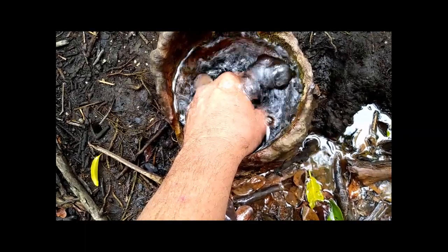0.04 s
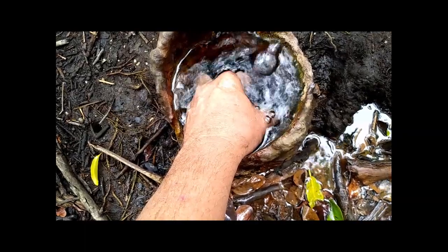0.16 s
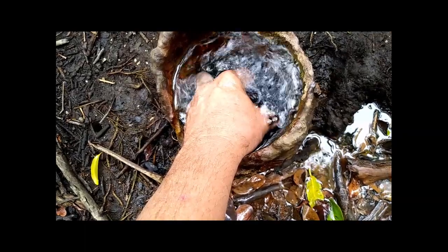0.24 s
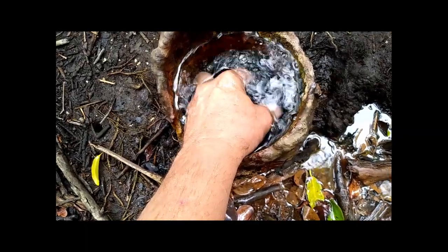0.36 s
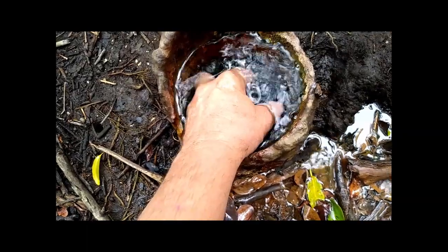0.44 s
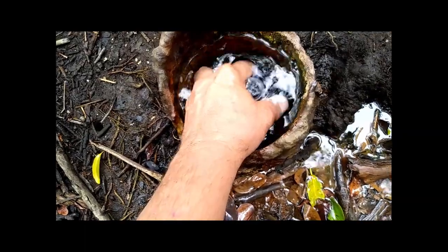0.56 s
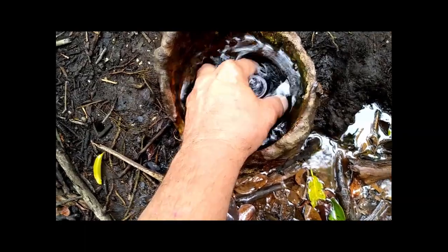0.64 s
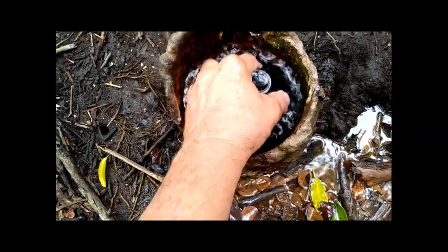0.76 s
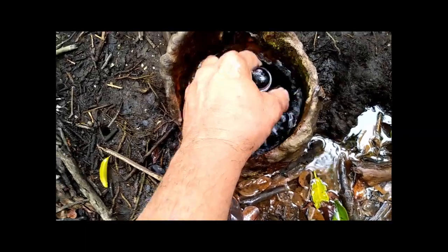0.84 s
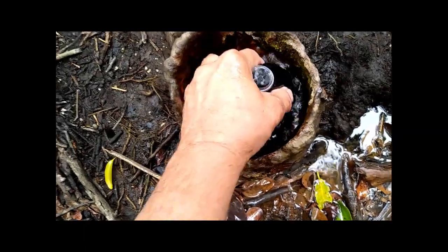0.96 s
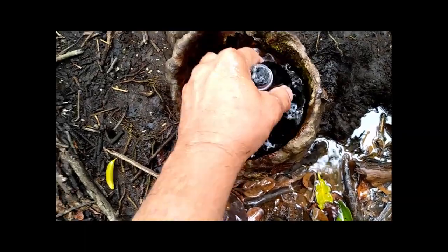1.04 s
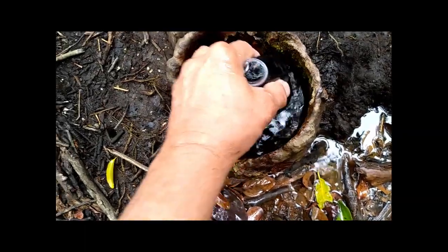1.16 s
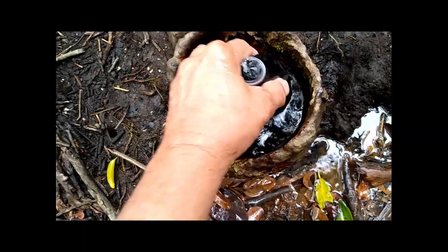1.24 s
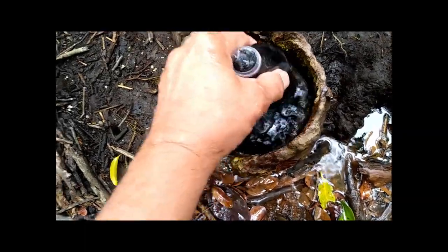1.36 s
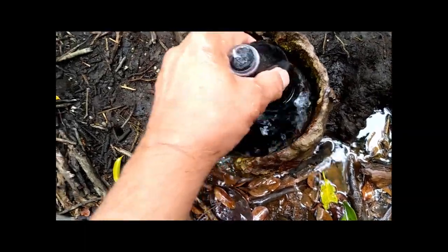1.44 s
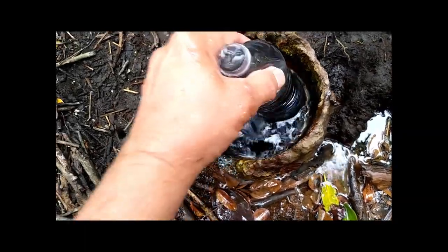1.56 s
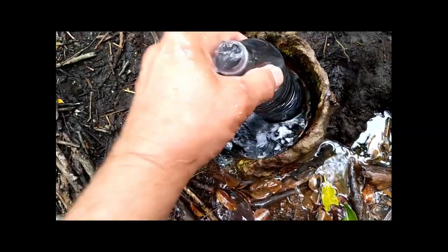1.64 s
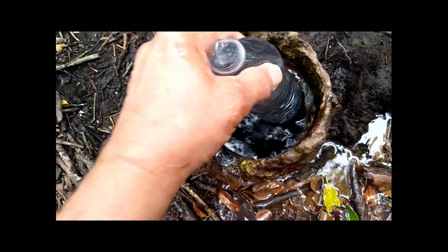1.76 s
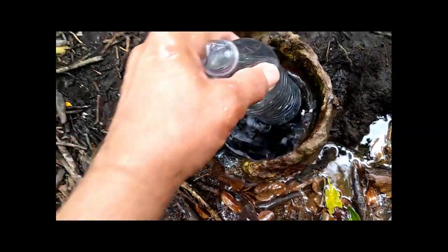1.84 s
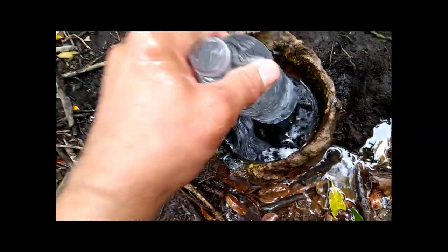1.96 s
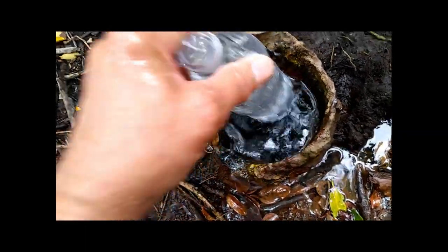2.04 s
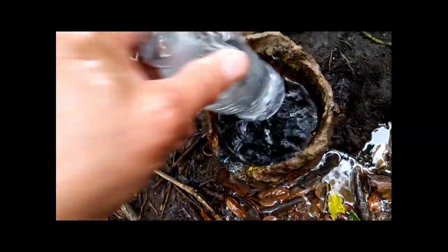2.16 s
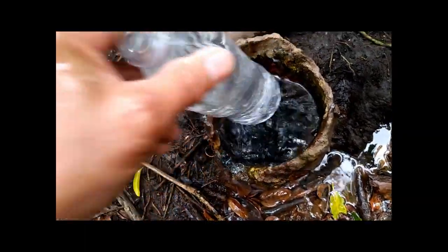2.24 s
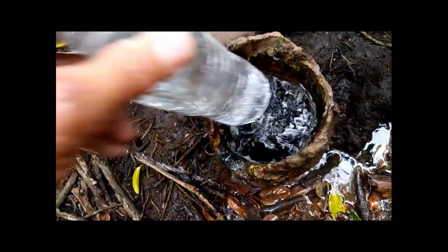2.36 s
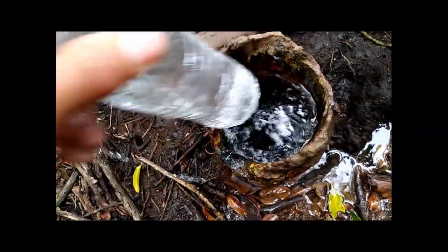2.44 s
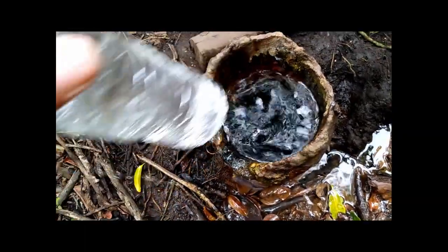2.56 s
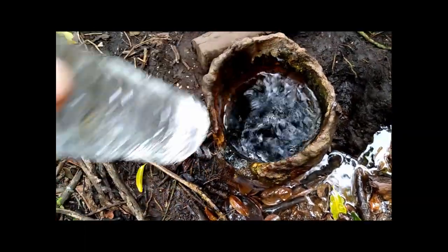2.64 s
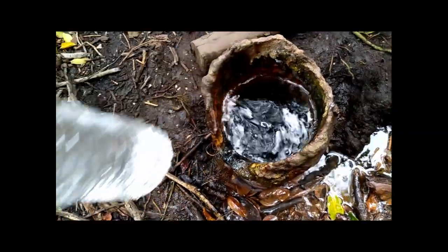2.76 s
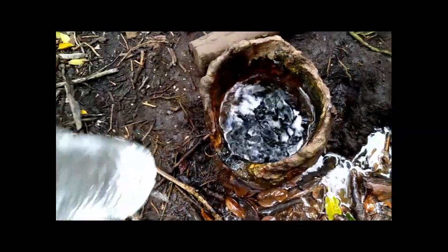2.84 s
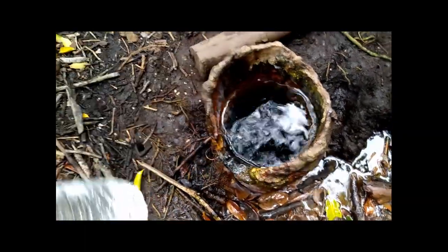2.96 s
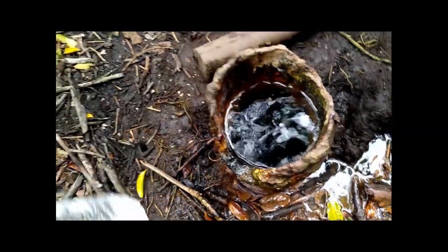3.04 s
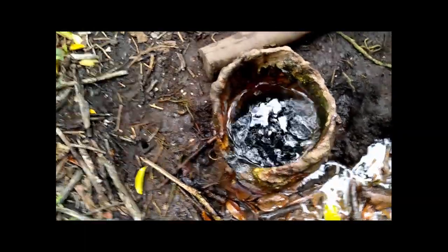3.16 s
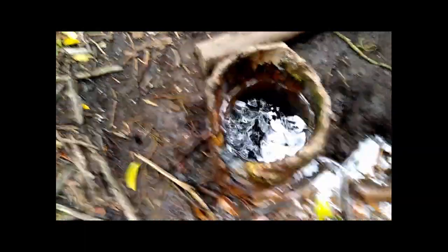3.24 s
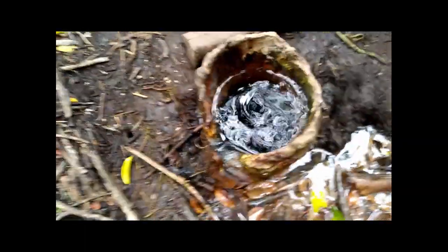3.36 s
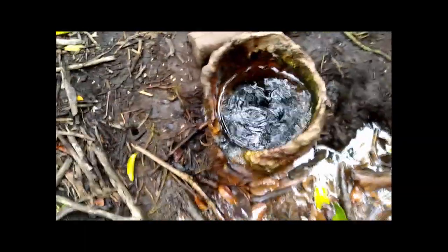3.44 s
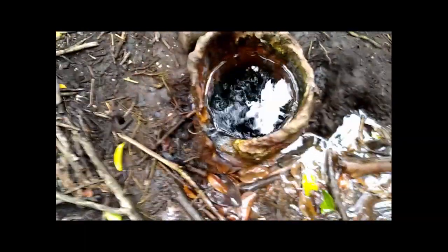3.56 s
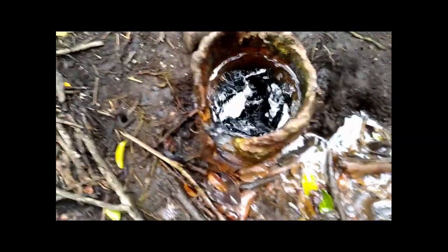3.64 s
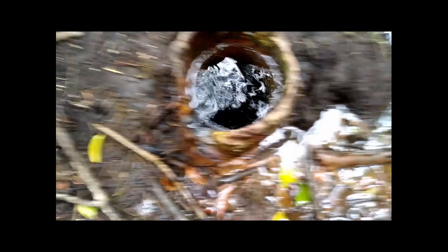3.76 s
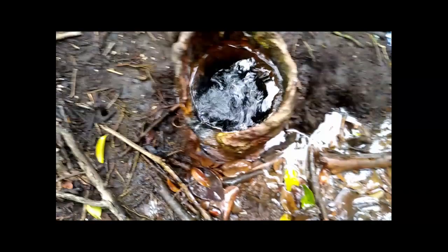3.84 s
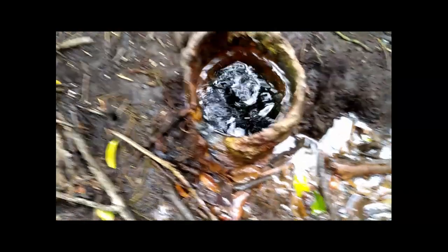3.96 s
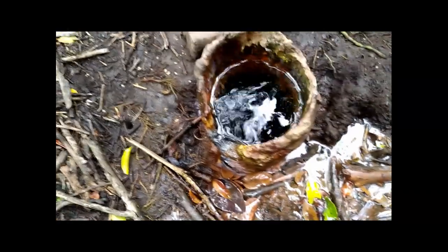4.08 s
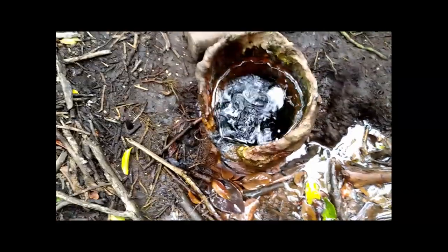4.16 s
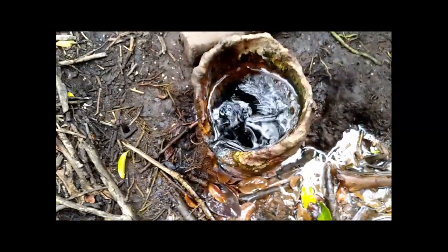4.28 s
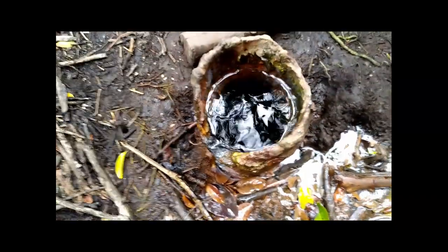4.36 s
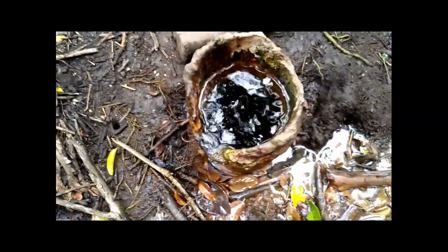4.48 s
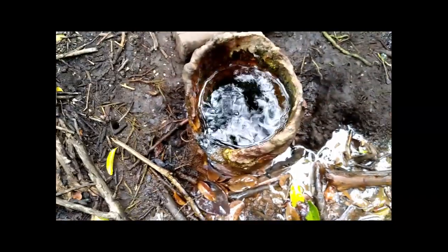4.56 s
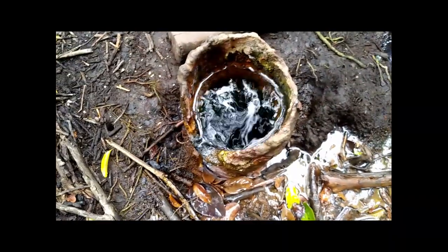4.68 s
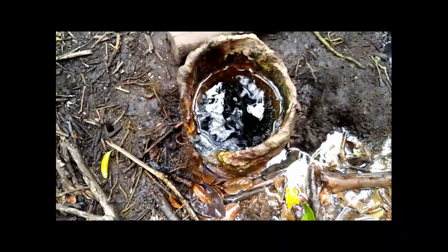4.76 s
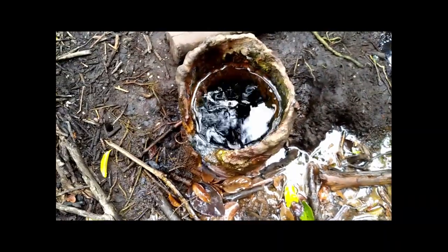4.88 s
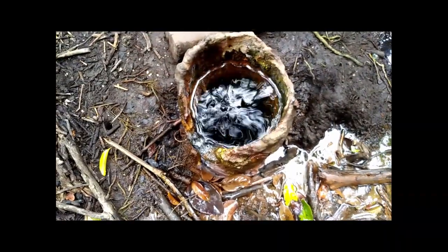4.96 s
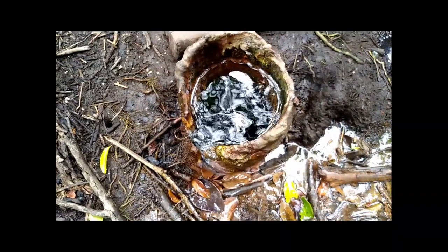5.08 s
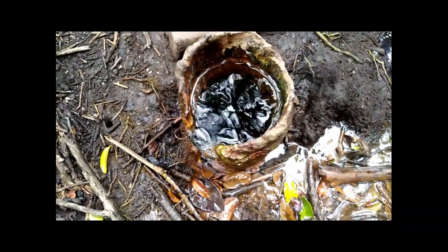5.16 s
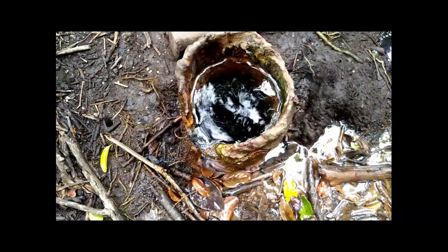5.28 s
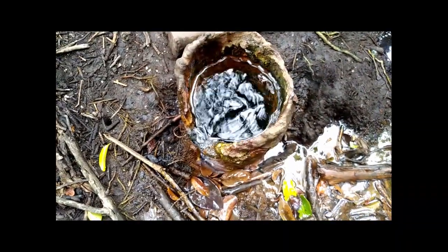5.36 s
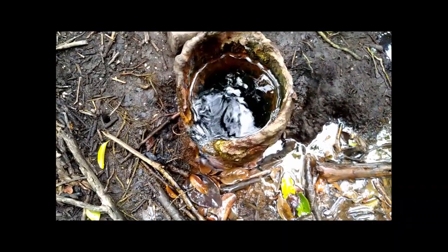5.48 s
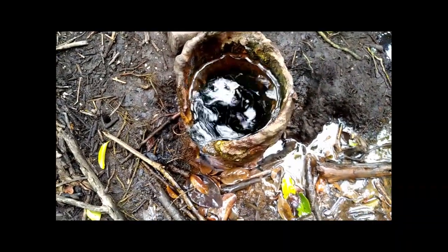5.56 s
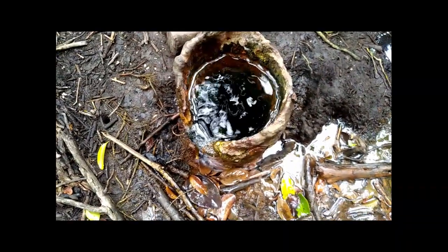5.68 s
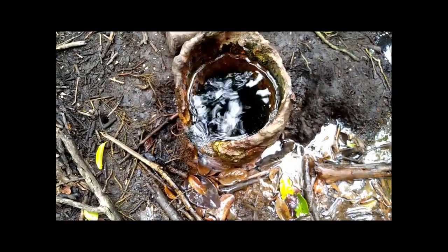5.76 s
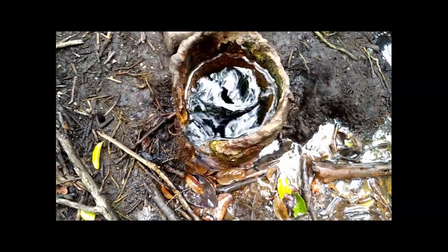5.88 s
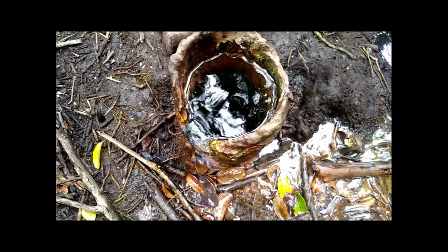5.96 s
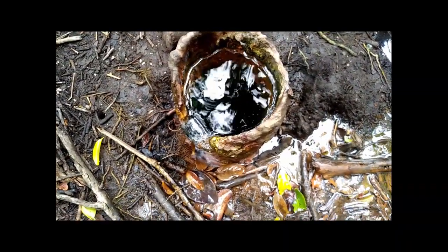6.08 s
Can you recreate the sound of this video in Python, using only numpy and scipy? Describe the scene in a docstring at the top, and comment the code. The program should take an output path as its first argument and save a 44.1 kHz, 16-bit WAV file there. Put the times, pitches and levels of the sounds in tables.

```python
"""A wood: a hand lifts a plastic bottle out of a water-filled pipe in the ground.
The water slaps once as a swarm of bubbles; drops fall back, each ringing bubbles under noise bursts.
Foam fizzes as scattered tiny bubbles; pipe hums and bottle murmurs are narrow resonances of noise.
Trees return sparse echoes of the drops over a steady outdoor hiss of coloured noise.
"""
import sys
import numpy as np
from scipy import signal
from scipy.fft import rfft, irfft
from scipy.io import wavfile
from scipy.ndimage import uniform_filter1d

SR = 44100
rng = np.random.default_rng(int(sys.argv[2]) if len(sys.argv) > 2 else 0)


def pcm_store(signal):
    """Save signal as 16-bit PCM."""
    levels = np.round(np.clip(np.atleast_2d(signal), -1, 1) * 32767)
    wavfile.write(sys.argv[1], SR, levels.astype(np.int16).T)


N = 269892

# Falling drops. Each row: start in seconds, first bubble in Hz, its peak in dB, second bubble in Hz,
# its peak in dB, ring t60 in seconds, crack level in dB, tick level in dB, top-band noise level in dB.
DROP_EVENTS = [(.103, 3310, -39.5, 6440, -66, 0.021, -50, -71, -90),
               (0.114, 1780, -38.5, 3380, -45, 0.017, -43, -62, -85),
               (.517, 2164, -35, 5850, -46, 0.02, -48, -72, -90),
               (.52, 2070, -28, 2380, -30, 0.011, -54, -67, -84),
               (.691, 2190, -23, 3400, -31.5, 0.018, -35, -44, -43),
               (.7, 2960, -29, 4970, -41, 0.035, -39, -57, -46),
               (.715, 2830, -32, 2160, -45, 0.032, -46, -60, -67),
               (.728, 1220, -25.5, 4850, -16.5, 0.012, -39, -28, -43),
               (.742, 1470, -24, 4600, -33, 0.015, -29, -40, -52),
               (.755, 6000, -34, 4800, -34, .014, -45, -37, -53),
               (0.765, 2194, -24.5, 5500, -24.5, 0.028, -28, -44, -49),
               (.772, 2130, -24, 2240, -26, .02, -45, -49, -56),
               (.786, 2830, -22, 2340, -25, 0.025, -25.5, -43, -42),
               (0.802, 2740, -12.5, 1800, -20, 0.018, -50, -61, -65),
               (0.814, 2800, -21, 1810, -19.5, 0.02, -27, -41, -37),
               (0.823, 2990, -15.5, 5890, -18, 0.028, -16, -25, -25),
               (.832, 3170, -19, 2210, -22, 0.019, -22, -55, -66),
               (.845, 3120, -17, 1526, -17.5, 0.023, -43, -60, -58),
               (0.861, 1736, -10, 2330, -12.5, .013, -16, -38, -31.5),
               (0.885, 1490, -19.5, 4810, -26, .024, -17, -58, -56),
               (0.893, 3770, -23.5, 2140, -39, 0.012, -32, -58, -60),
               (0.901, 6400, -44, 2540, -34, 0.016, -52, -52, -70),
               (0.933, 6200, -49, 3840, -37, .016, -50, -49, -68),
               (1.162, 5750, -56, 5960, -60, 0.037, -71, -80, -90),
               (1.3898, 3175, -12, 6000, -35, 0.015, -32.5, -63, -88),
               (1.427, 6000, -52, 3300, -48, .012, -60, -70, -90),
               (1.4323, 3620, -25, 4160, -51, 0.01, -42, -65, -87),
               (1.445, 6100, -51, 2900, -52, .015, -62, -62, -88),
               (1.77, 4480, -34.5, 2180, -34, 0.0083, -35.5, -65, -75),
               (1.817, 1323, -40.5, 4940, -47, 0.062, -44, -62, -56),
               (1.909, 5300, -22, 3890, -37, 0.013, -57, -36.5, -77),
               (1.97, 5770, -29, 3800, -56, 0.021, -58, -52, -80),
               (1.987, 3100, -47, 5000, -49, 0.049, -55, -59, -57),
               (2.027, 2492, -14.5, 4900, -44, 0.02, -32, -67, -62),
               (2.075, 2400, -33.5, 5100, -45, 0.022, -41, -64, -61),
               (2.179, 6050, -51, 2300, -60, .015, -66, -46, -63),
               (2.193, 5780, -35, 2450, -67, 0.01, -65, -69, -100),
               (2.223, 4940, -40, 5350, -31.5, 0.0075, -64, -49, -90),
               (2.256, 4910, -25.5, 4240, -32, 0.014, -64, -67, -84),
               (2.287, 2620, -49, 5600, -50, 0.027, -63, -70, -75),
               (2.334, 5300, -40.5, 4170, -62, .02, -63, -63, -68),
               (2.359, 6700, -40, 4100, -53, 0.015, -64, -68, -90),
               (2.367, 6200, -46, 4060, -48, .013, -80, -80, -90),
               (2.395, 2304, -27.5, 6180, -34, 0.019, -29, -67, -61),
               (2.403, 3200, -28.5, 5050, -40, 0.013, -38, -55, -44),
               (2.411, 4910, -22.5, 4070, -28, .014, -23, -44, -57),
               (2.456, 5800, -47, 1980, -62, .014, -46, -56, -49),
               (2.465, 3400, -38.5, 4650, -45, 0.01, -55, -66, -69),
               (2.623, 3060, -39, 2160, -45.5, 0.017, -42, -55, -69),
               (2.628, 4010, -38, 4760, -38, 0.018, -30.5, -42, -55),
               (2.655, 4800, -40, 3840, -49, 0.018, -57, -63, -50),
               (2.713, 6460, -39.5, 2510, -64, 0.015, -55, -37, -46),
               (2.749, 3310, -45, 1730, -48, 0.031, -48, -67, -82),
               (2.776, 3600, -34, 4900, -44, 0.015, -65, -76, -86),
               (2.78, 2780, -40.5, 1740, -47, 0.035, -46, -74, -73),
               (2.81, 2660, -44, 4750, -41, 0.023, -58, -72, -59),
               (2.827, 5030, -36.5, 2460, -50, 0.023, -56, -63, -59),
               (2.846, 5670, -34.5, 3700, -45, 0.0055, -61, -61, -62),
               (2.852, 5840, -40, 2600, -58, 0.012, -56, -67, -49),
               (2.873, 5650, -51, 2500, -69, .014, -68, -66, -80),
               (2.935, 2720, -47.5, 5800, -56, 0.041, -65, -74, -50),
               (2.952, 5530, -18, 3980, -37, 0.018, -52, -53, -45),
               (2.968, 1995, -18.5, 2800, -25, 0.0095, -15, -35.5, -60),
               (2.969, 1578, -26.5, 6260, -23.5, 0.019, -27, -43, -70),
               (2.984, 2480, -41, 5000, -48, .02, -53, -67, -72),
               (3.048, 2510, -45, 5100, -43.5, 0.024, -63, -71, -90),
               (3.063, 2760, -32, 1910, -48, 0.013, -58, -70, -89),
               (3.074, 2480, -38.5, 5170, -59, .02, -62, -68, -68),
               (3.105, 5460, -40, 3160, -42, 0.0093, -54, -63, -90),
               (3.123, 3220, -34, 3940, -33.5, 0.013, -49, -67, -90),
               (3.145, 5570, -36, 3560, -41, 0.0058, -60, -39, -80),
               (3.333, 4770, -41.5, 1430, -48, 0.015, -44, -55, -84),
               (3.538, 3560, -44, 4900, -44.5, 0.017, -48, -42, -53),
               (3.579, 3630, -62, 4600, -66, .016, -59, -48, -53),
               (3.71, 4420, -49.5, 3680, -54, 0.026, -68, -66, -74),
               (3.85, 1046, -33.5, 3600, -38.5, 0.013, -40.5, -54, -46.5),
               (3.852, 1360, -34.5, 4750, -43.5, 0.018, -59, -60, -70),
               (4.043, 6050, -36, 820, -61, 0.016, -57, -37.5, -85),
               (4.385, 6120, -51.5, 1420, -65, .016, -69, -53, -87),
               (4.752, 3900, -32.5, 4160, -59, .006, -63, -64, -82),
               (4.893, 3900, -50, 1500, -63, .008, -70, -75, -90),
               (4.898, 3740, -20.5, 1430, -26, 0.0085, -20.5, -41, -54),
               (5.303, 3650, -39, 5090, -54, .012, -62, -51, -84),
               (5.874, 4360, -53, 1500, -68, 0.014, -65, -66, -86),
               (6.108, 6440, -48.5, 2400, -74, .016, -71, -70, -87)]
# Strength of the slap's bubbles by pitch, before a rising tilt. Each row: pitch in Hz, gain in dB.
SLAP_SPECTRUM = [(530, -70), (900, -40), (1050, -32), (1500, 13.5), (2530, 3), (3010, 7.5), (4100, -4.5),
                 (5700, -6.5), (8000, -28), (10400, -61), (17600, -120)]
# Foam popping after some splashes. Each row: start in seconds, starting level in dB,
# commonest bubble in Hz, t60 in seconds, spread of sizes from 0 to 1 (log pitch, either way).
FIZZ_EVENTS = [(.108, -57, 3300, .25, 0), (.525, -56.5, 2160, 0.32, .12), (1.437, -60, 3500, 0.24, 0.2),
               (1.975, -60.5, 5600, 0.31, .12), (.9, -56, 4450, .5, .2), (1.405, -54.5, 3360, .6, 0.24),
               (1.78, -53.5, 4630, .5, 0.22), (1.915, -65, 4980, .3, 0.3), (2.045, -47, 2495, .5, 0.13),
               (2.265, -56.5, 4460, .3, .15), (2.405, -58, 2700, .3, 0.3), (2.8, -54, 3970, 0.54, .25),
               (2.635, -47.5, 4510, 0.46, 0.24), (2.63, -60, 2870, 0.26, 0.33),
               (2.785, -53.5, 2730, .5, 0.19), (2.958, -66, 5400, 0.23, 0.1),
               (2.975, -50.5, 2240, .45, 0.43), (2.975, -56, 3940, 0.42, 0.29), (3.065, -51, 2840, .4, .15),
               (3.13, -55.5, 3670, .6, 0.13), (2.83, -64, 5000, .3, 0.12), (3.545, -63, 3670, .5, 0),
               (3.86, -58, 3640, .4, 0), (3.86, -48, 1172, .3, 0.23), (4.76, -61, 4200, .4, 0.02),
               (4.905, -49.5, 3385, .4, 0.31), (4.905, -54, 1440, .25, .15), (5.31, -62.5, 3680, .4, 0.02)]
# Pipe hums as the water runs. Each row: peak time in seconds, peak level in dB, swell in seconds,
# sink in seconds, pitch in Hz.
HUM_EVENTS = [(.695, -53, 0.011, 0.054, 720), (.865, -47.5, .01, 0.03, 660), (.97, -56.5, .08, 0.094, 4680),
              (1.52, -57, .03, 0.051, 2510), (1.61, -52, .02, 0.04, 1006), (1.635, -54, 0.035, 0.034, 1260),
              (1.65, -54.5, 0.093, 0.22, 2466), (1.64, -63, .06, 0.048, 3600), (1.665, -65, .03, .03, 4140),
              (1.699, -55, .02, 0.052, 1310), (1.734, -52, .03, 0.032, 760), (1.772, -51, .04, .12, 2060),
              (1.773, -47.5, .03, 0.053, 1405), (1.785, -53.5, .03, 0.047, 984),
              (1.789, -57, .05, 0.071, 3335), (1.799, -49.5, .05, 0.2, 2480),
              (1.831, -51.5, .03, 0.23, 1273), (1.85, -59, .06, 0.18, 3680), (1.952, -70, .03, 0.043, 1250),
              (2.02, -55, .05, 0.064, 3250), (2.712, -59, .05, 0.051, 2505), (2.785, -64, .02, 0.025, 800),
              (2.801, -49.5, .04, 0.049, 2563), (2.98, -58, .02, 0.036, 652),
              (3.819, -62, .03, 0.057, 2520), (3.928, -57.5, .08, .05, 2570),
              (3.966, -61, .03, 0.038, 2210), (4.009, -55, .03, .05, 2465), (4.02, -51, .03, 0.055, 760),
              (4.136, -48, .12, 0.12, 2476), (4.14, -56.5, .04, 0.062, 1950),
              (4.14, -57.5, .03, 0.099, 1144), (4.17, -57, .06, 0.11, 2210),
              (4.252, -47.5, .06, 0.078, 2456), (4.27, -56, .04, 0.028, 1370),
              (4.344, -54.5, .04, 0.033, 1370), (4.42, -60, .04, 0.028, 2160)]
# Air column of the sunk bottle as it gulps. Each row: peak time in seconds, peak level in dB,
# swell in seconds, sink in seconds.
BOTTLE_MURMURS = [(.3, -69, .04, .1), (0.495, -63.5, 0.081, 0.09), (.6, -58.5, 0.032, 0.091),
                  (0.801, -49.5, .04, 0.043), (0.858, -53, .03, 0.026), (.974, -48, .07, 0.079),
                  (2.719, -64.5, .06, 0.077)]
# Decay of the tree echoes by band. Each row: frequency in Hz, t60 in seconds.
ECHO_T60 = [(500, 0.18), (1500, 0.23), (3000, 0.26), (6000, 0.32), (12000, 0.23)]
# Strength of the tree echoes by band. Each row: frequency in Hz, gain in dB.
ECHO_SPECTRUM = [(500, 7), (2000, 9.5), (4500, 7), (7000, -4), (14000, 13)]
# Shape of the hiss spectrum. Each row: frequency in Hz, relative density in dB per Hz.
HISS_SPECTRUM = [(20, -9), (200, -3.5), (340, -1.5), (460, 0), (1060, -2.5), (2330, -5.5), (2890, -7.5),
                 (6000, -14), (12700, -18), (13000, -36), (16000, -39)]

FROTH_GAIN, FROTH_RING_RATIO = .09, 1.3  # each like-sized bubble against the main one
SMALL_HZ, SMALL_RING_RATIO = 4500, 0.56  # bubbles above this pitch ring shorter
SLAP_START_S, SLAP_RISE_S, SLAP_HOLD_S, SLAP_FADE_S = .686, .006, 0.17, 0.21
SLAP_DB, SLAP_FADE_DB = -32.5, -34.5  # level while held, change by the end of the fade
FIZZ_RANGE_DB = 25.5  # foam stops once faded this far
SWELL_DB = -15  # level one swell time before or one sink time after a hum's peak
HUM_WIDTH_HZ, HUM_WIDTH_AT_HZ = 73, 2600  # pole width at this pitch; inversely proportional to pitch
BOTTLE_HZ, BOTTLE_WIDTH_HZ = 420, 60  # pitch, pole width
ECHO_GAIN_DB = -19
HISS_DB = -58.5
EDGE_HZ = 16000


def gain_of(db):
    """Decibels to an amplitude factor."""
    return 10 ** (np.asarray(db) / 20)


def evened(x):
    """Scales to rms 1."""
    return x / np.sqrt(np.mean(x ** 2) + 1e-20)


def read(points, hz):
    """Interpolates a table on a log-frequency axis."""
    point_hz, value = np.transpose(points)
    return np.interp(np.log(hz + 1), np.log(point_hz + 1), value)


def add(mix, start_s, sound):
    """Mixes a sound in at start_s, cut at the end of the mix."""
    part = mix[round(start_s * SR):][:len(sound)]
    part += sound[:len(part)]


def bubble(hz, t60_s, phase, late_s=0., rise_cycles=4.3, glide_per_s=0.2, round_off=1.66, size=3000):
    """A ringing bubble of envelope peak 1: swells, climbs a little as it nears the surface, dies."""
    t = np.maximum(np.arange(size) / SR - late_s, 0)
    rise = np.sin(np.pi / 2 * np.minimum(t * hz / rise_cycles, 1)) ** 2
    envelope = rise * gain_of(-60 * (t / max(t60_s, .003)) ** round_off)
    cycles = hz * t * (1 + glide_per_s * t) + phase
    return envelope / envelope.max() * np.sin(2 * np.pi * cycles)


def puff(low_hz, high_hz, t60_s, rise_s=0.0016):
    """A short burst of band noise with exponential decay."""
    t = np.arange(3000) / SR
    band = signal.butter(4, [low_hz, high_hz], "bandpass", fs=SR, output="sos")
    noise = evened(signal.sosfilt(band, rng.standard_normal(len(t))))
    return noise * np.minimum(t / rise_s, 1) * gain_of(-60 * t / t60_s)


def drops():
    """Each drop: two bubbles with like-sized froth, impact crack and tick, a faint very high noise burst."""
    out = np.zeros(N)
    chance = rng.random((len(DROP_EVENTS), 2, 4, 3))
    for (start_s, *rings, t60_s, crack_db, tick_db, top_db), luck in zip(DROP_EVENTS, chance):
        sound = gain_of(crack_db) * puff(1700, 6450, t60_s)
        for hz, db, lot in zip(rings[::2], rings[1::2], luck):
            ring_s = t60_s * (SMALL_RING_RATIO if hz > SMALL_HZ else 1)
            main = bubble(hz, ring_s, lot[0, 0])
            froth = sum(bubble(hz * (.82 + 0.47 * size), FROTH_RING_RATIO * ring_s, phase, 0.0035 * late)
                        for size, phase, late in lot[1:])
            sound += gain_of(db) * (main + FROTH_GAIN * froth)
        sound += gain_of(tick_db) * puff(5600, 11400, 0.0089)
        sound += gain_of(top_db) * puff(11160, 16200, 0.022)
        add(out, start_s, sound)
    return out


def slap(per_s=150, spread_db=5.5):
    """Bubbles of 36 pitches, each struck at random moments, under one rise, hold and fade."""
    t = np.arange(0, SLAP_HOLD_S + SLAP_FADE_S, 1 / SR)
    swarm = np.zeros(len(t))
    for hz in np.geomspace(1100, 7500, num=36):
        strength = gain_of(spread_db * np.minimum(rng.exponential(1, len(t)), 4))
        strikes = strength * (rng.random(len(t)) < per_s / SR)
        colour = gain_of(read(SLAP_SPECTRUM, hz)) * hz ** 1.25
        ring = bubble(hz, 45 / hz, rng.random()) * colour
        swarm += signal.oaconvolve(strikes, ring)[:len(t)]
    fade = np.maximum(t - SLAP_HOLD_S, 0) / SLAP_FADE_S
    level = np.minimum(t / SLAP_RISE_S, 1) * gain_of(SLAP_DB + SLAP_FADE_DB * fade ** 1.62)
    return SLAP_START_S, level * evened(swarm)


def fizz(start_s, db, hz, t60_s, spread, per_s=1500):
    """Foam: tiny bubbles at random moments, sizes scattered around the commonest, fading."""
    t = np.arange(0, t60_s * FIZZ_RANGE_DB / 60, 1 / SR)
    pops = np.zeros(len(t) + 3000)
    for when, size, phase, loud in rng.random((round(per_s * t[-1]), 4)):
        pitch_hz = hz * np.exp(spread * (2 * size - 1))
        pop = gain_of(21.0 * loud) * bubble(pitch_hz, 40 / pitch_hz, phase, size=1400)
        add(pops, when * len(t) / SR, pop)
    fade = gain_of(db - 60 * t / t60_s)
    return start_s, fade * evened(pops[:len(t)]) * np.minimum(t / .004, 1)


def resonate(x, hz, width_hz):
    """Moving resonance: shifts hz down to zero, smooths with two equal poles, shifts back."""
    turn = np.exp(2j * np.pi * np.cumsum(hz * np.ones(len(x))) / SR)
    r = np.exp(-np.pi * width_hz / SR)
    return (turn * signal.lfilter([1], np.convolve([1, -r], [1, -r]), x / turn)).real


def slow_noise(x, window, size):
    """Noise smoothed twice by a moving average, scaled to rms 1, then cut to size."""
    return evened(uniform_filter1d(uniform_filter1d(x, window), window))[:size]


def hum(peak_s, db, swell_s, sink_s, hz, width_hz, waver=0.009, throb_db=3.0):
    """Turbulent water drives a narrow pitch that swells, wavers, throbs and sinks."""
    t = np.arange(-2 * swell_s, 2 * sink_s, 1 / SR)
    noise, drift, throb = rng.standard_normal((3, SR))
    drift = slow_noise(drift, 900, len(t))
    throb = slow_noise(throb, 350, len(t))
    level_db = db + SWELL_DB * np.maximum(-t / swell_s, t / sink_s) + throb_db * throb
    tone = evened(resonate(noise[:len(t)], hz * (1 + waver * drift), width_hz))
    return peak_s + t[0], gain_of(level_db) * tone


def trees(x, gap_s=0.0044):
    """Scattering: sparse echoes of random sign, each band dying at its own speed."""
    taps = np.zeros(SR // 2)
    at = np.arange(round(gap_s * SR), len(taps) - 20, 20)
    taps[at + rng.integers(0, 20, len(at))] = rng.choice([-1., 1.], len(at))
    hz, t, bands = signal.stft(taps, SR, nperseg=128)
    strength_db = read(ECHO_SPECTRUM, hz)[:, None]
    decay_db = 60 * t / read(ECHO_T60, hz)[:, None]
    tail = signal.istft(bands * gain_of(strength_db - decay_db), SR, nperseg=128)[1]
    return signal.fftconvolve(x, tail / np.linalg.norm(taps[:2000]) * 1.4)[:N]


def hiss():
    """Steady coloured noise, falling with pitch and dropping steeply near 13 kHz."""
    colour = gain_of(read(HISS_SPECTRUM, np.fft.rfftfreq(N, 1 / SR)))
    return gain_of(HISS_DB) * evened(irfft(rfft(rng.standard_normal(N)) * colour, N))


def scene():
    """Drops with their echoes, the slap, pipe hums, bottle murmurs, foam and hiss."""
    drip = drops()
    water = drip + gain_of(ECHO_GAIN_DB) * trees(drip)
    add(water, *slap())
    for row in HUM_EVENTS:
        add(water, *hum(*row, HUM_WIDTH_HZ * HUM_WIDTH_AT_HZ / row[-1]))
    for row in BOTTLE_MURMURS:
        add(water, *hum(*row, BOTTLE_HZ, BOTTLE_WIDTH_HZ))
    for row in FIZZ_EVENTS:
        add(water, *fizz(*row))
    return (water + hiss())[None]


def record(dry):
    """Gain control ducks around loud splashes and recovers; then soft clipping and a band limit."""
    power_db = 10 * np.log10(abs(uniform_filter1d(dry[0] ** 2, 2000)) + 1e-12)
    fall_db = np.arange(N) * 77.0 / SR  # held peaks fall 77 dB a second
    held_db = np.maximum.accumulate(power_db + fall_db) - fall_db
    over_db = np.maximum(held_db + 33.5, 0)  # above a threshold of -33.5 dB
    ducked = dry / gain_of(0.34 * uniform_filter1d(over_db, 400))
    clipped = .3 * np.tanh(ducked / .3)  # the loudest peaks flatten
    low_pass = signal.firwin(511, EDGE_HZ, window=("kaiser", 9), fs=SR)
    return signal.oaconvolve(clipped, low_pass[None], "same")


dry = scene()
out = record(dry)
pcm_store(out)
```